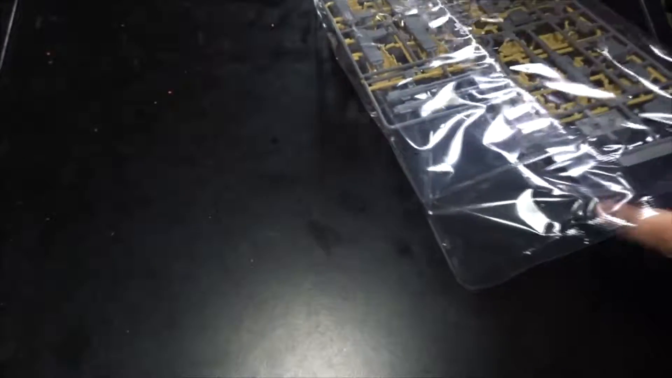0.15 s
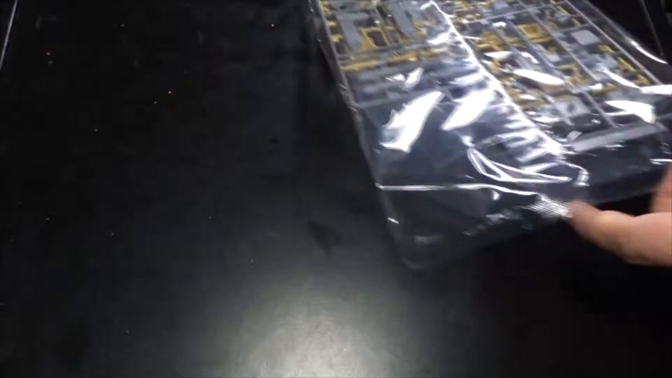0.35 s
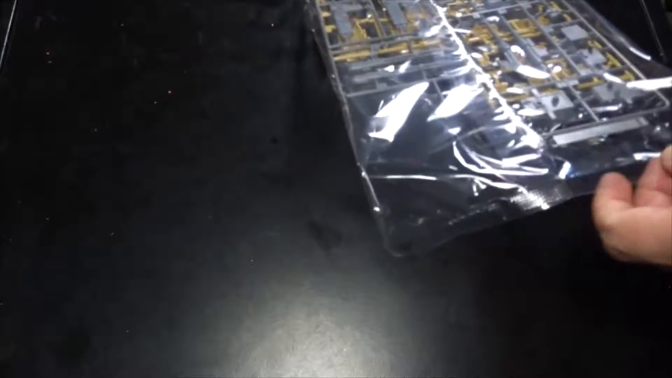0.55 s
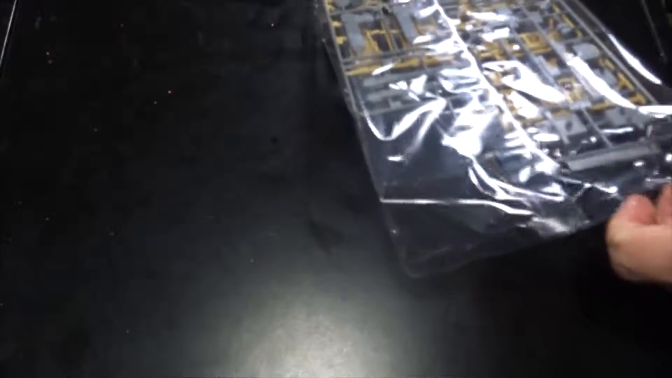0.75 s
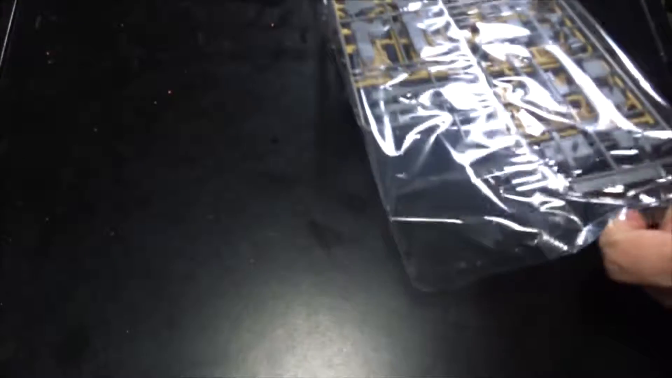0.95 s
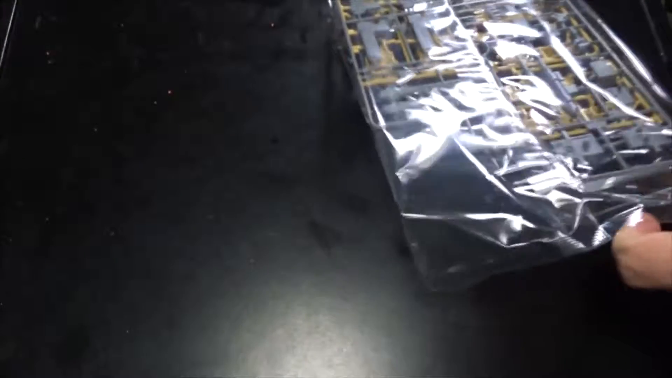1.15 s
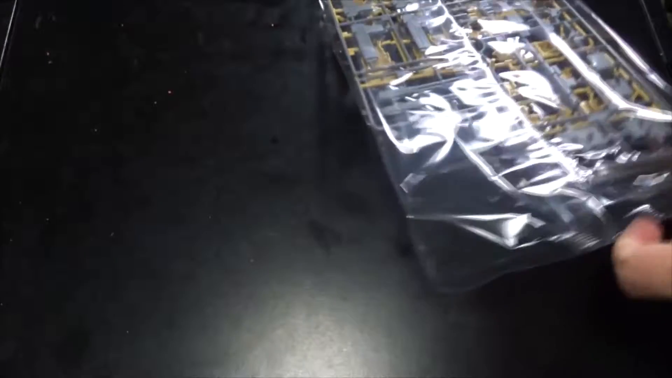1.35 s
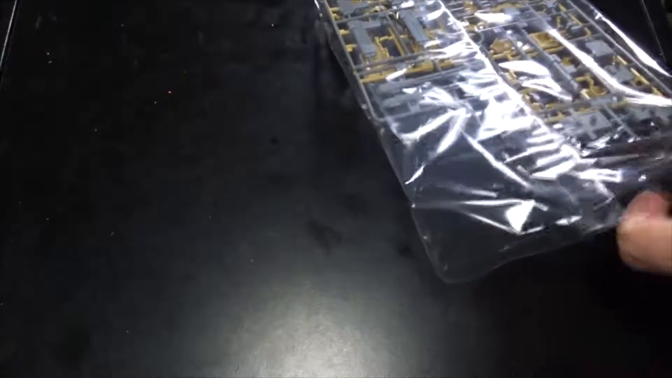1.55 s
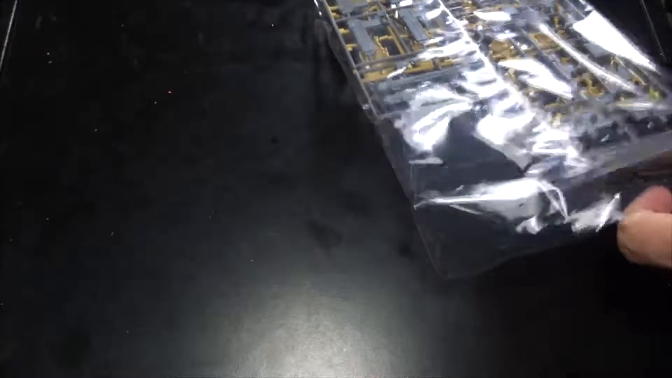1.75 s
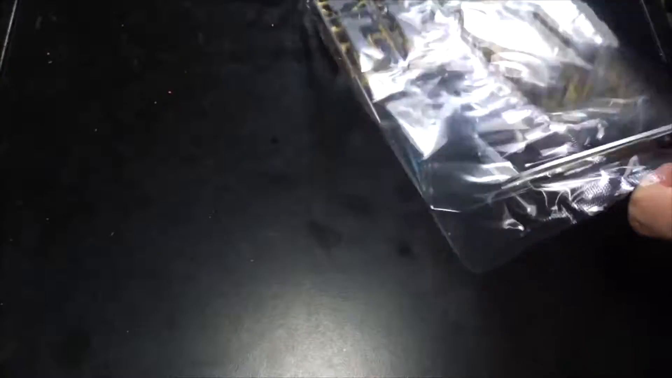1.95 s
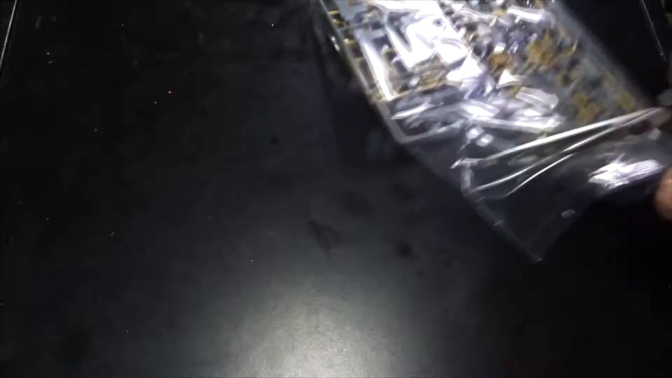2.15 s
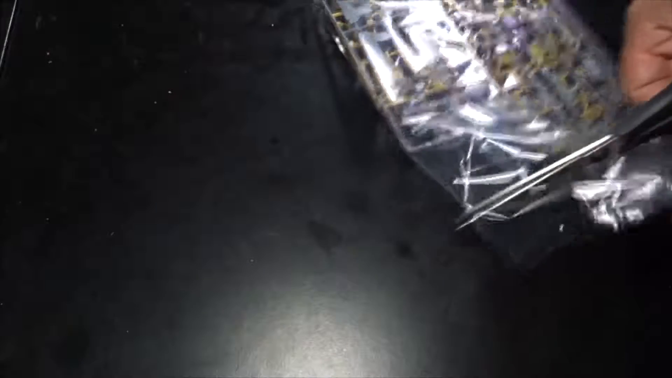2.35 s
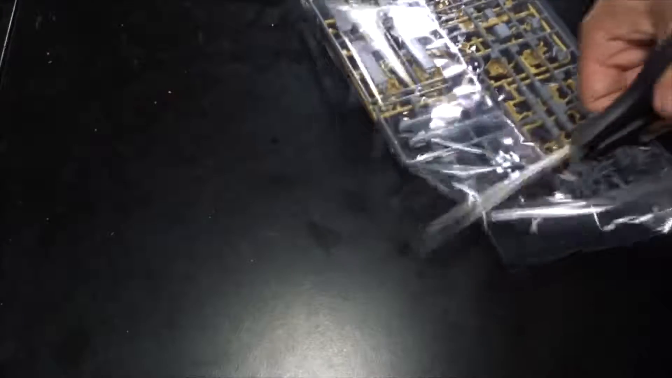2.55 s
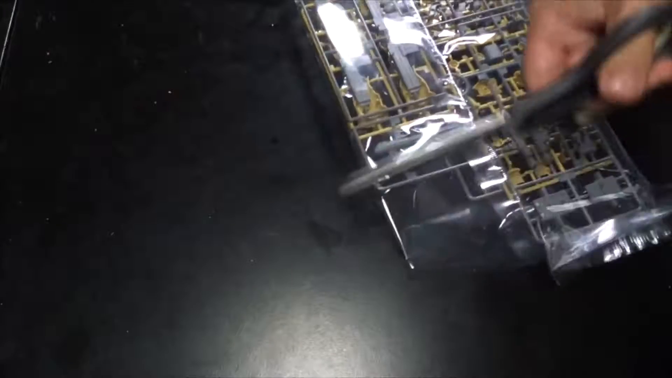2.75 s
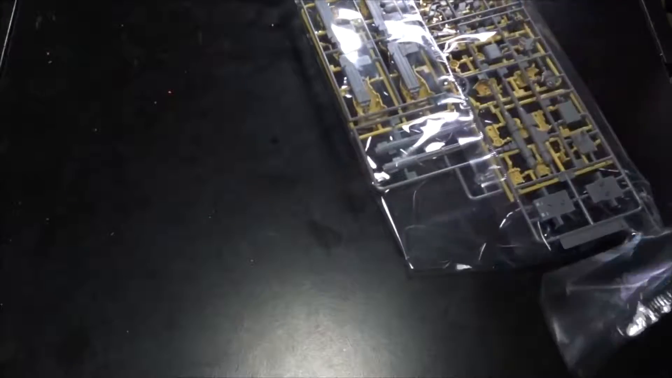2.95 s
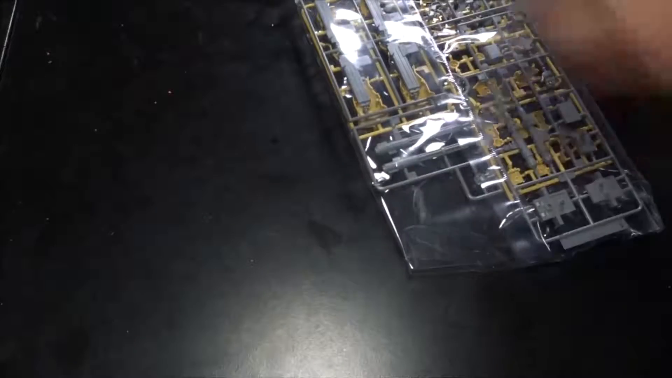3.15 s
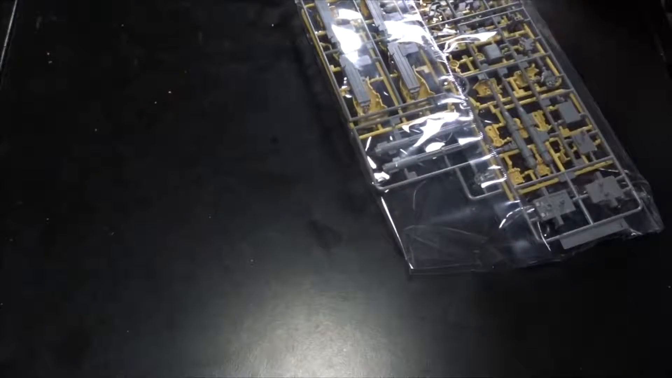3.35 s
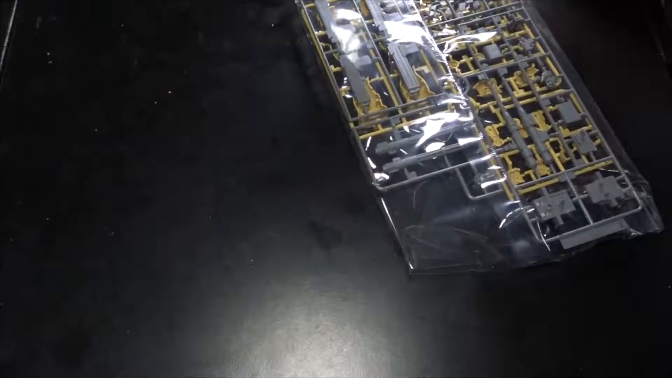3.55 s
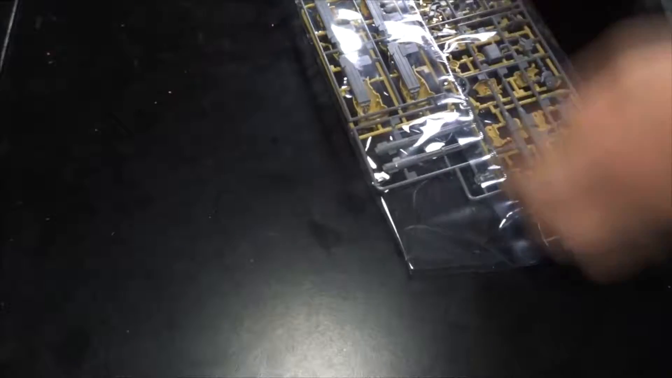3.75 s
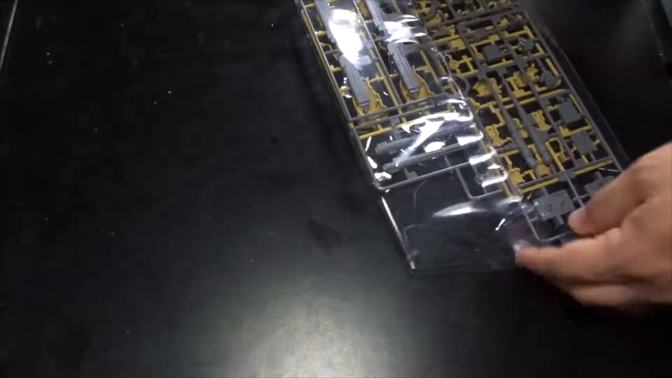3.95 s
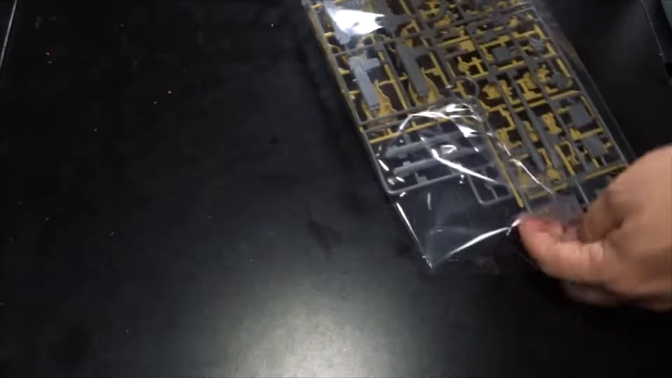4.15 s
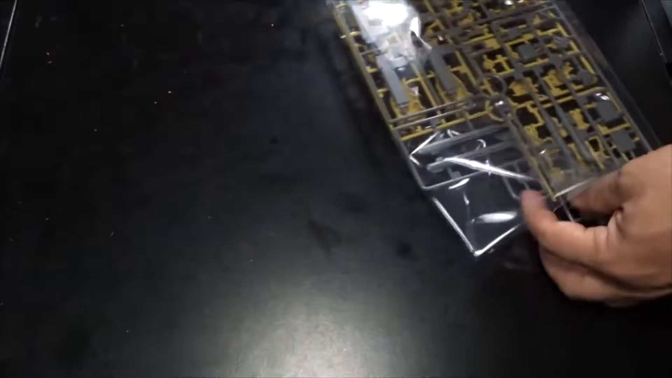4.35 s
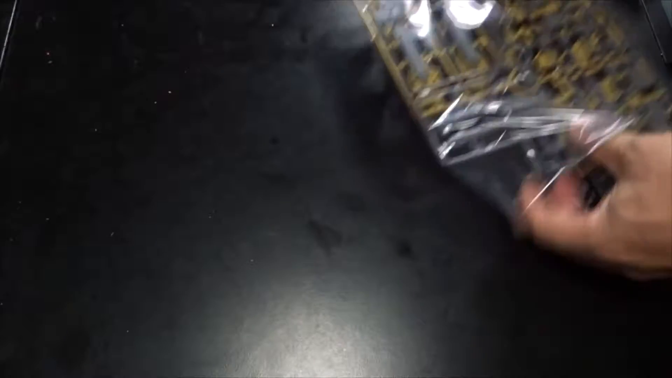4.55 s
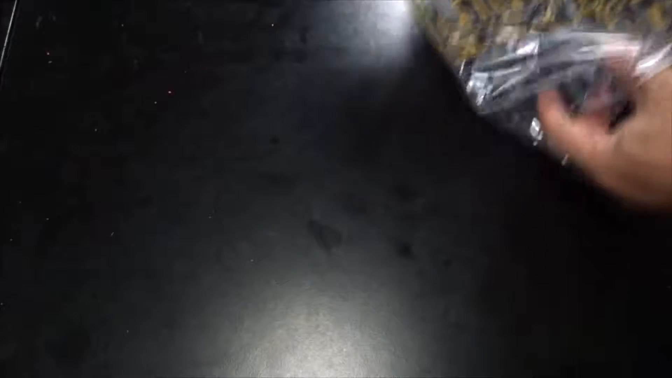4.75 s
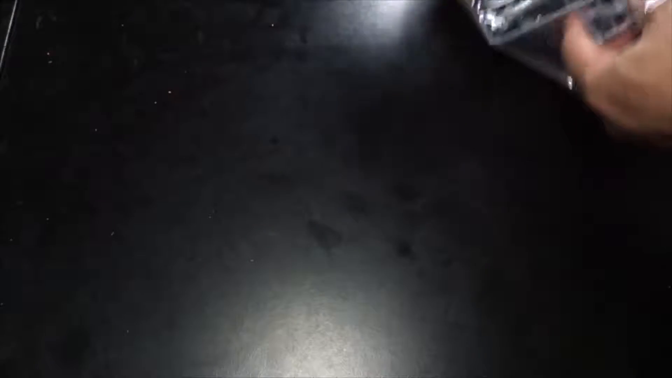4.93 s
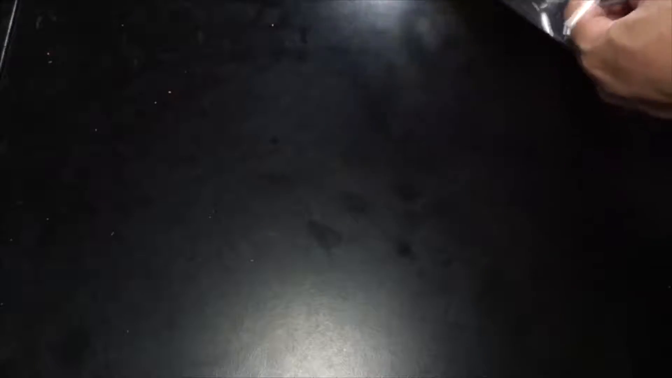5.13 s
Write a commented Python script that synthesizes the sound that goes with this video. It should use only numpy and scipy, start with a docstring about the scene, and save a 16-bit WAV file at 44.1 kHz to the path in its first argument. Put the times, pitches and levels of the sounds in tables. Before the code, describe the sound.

A thin, stiff clear plastic bag of small plastic parts is handled on a table in a small room, heard close in stereo, slightly right of centre. For the first 0.8 seconds there are only faint, scattered ticks over soft room hiss and a barely audible fan hum. From about 0.8 seconds the film bursts into dense, irregular crackling, sharp bright snaps mixed with lower, hollow slack folds, carrying on through pulling and cutting until roughly 2.85. A few isolated ticks follow near 3.1. Scissors are set down: a light knock at 3.4, then a firmer double-edged clack around 3.55 with a bright, short steel rattle. Near-quiet with a couple of ticks until 4.0, then the bag crinkles again, sparse at first, thickening from 4.2 as it is lifted away, with strong, crisp snaps right up to the end at about 5.3. Short room reflections follow each sound.

```python
"""Small, sparse crackles open over a faint fan hum, then swell into a dense spell of sharp plastic snaps.
Hands pull, cut and lift a thin stiff bag on a table, close to a stereo microphone, in two spells.
Between them scissors are laid down with two knocks. A small room answers.
Creases are spiky noise bursts through a resonance; scissors are dying noise through table and blades;
the room is decaying noise used as echoes; the air is shaped noise, the fan a few unsteady sines."""
import sys
import numpy as np
from scipy import signal
from scipy.fft import rfft, irfft, next_fast_len
from scipy.io import wavfile
from scipy.ndimage import map_coordinates

SR = 44100
rng = np.random.default_rng(int(sys.argv[2]) if len(sys.argv) > 2 else 0)


def generate_wav(signal):
    """Clip the signal to [-1, 1] and save it as 16-bit WAV at the path in sys.argv[1]."""
    frames = np.transpose(np.atleast_2d(signal))
    scaled = np.clip(frames, -1, 1) * 32767
    pcm = np.round(scaled).astype(np.int16)
    wavfile.write(sys.argv[1], SR, pcm)


N = 233331  # length in samples


def amp(db):
    """dB to gain."""
    return 10 ** (np.asarray(db) / 20)


def unit(x):
    """Scaled to rms 1."""
    return x / np.sqrt(np.mean(x ** 2) + 1e-20)


def along(points, hz):
    """Read a curve of (Hz, value) points on a log frequency axis."""
    point_hz, value = np.transpose(points)
    return np.interp(np.log(hz + 1), np.log(point_hz + 1), value)


def wobble(rate):
    """A smooth random curve with rate knots a second."""
    knots = rng.standard_normal(int(N * rate / SR) + 4)
    return map_coordinates(knots, [np.arange(N) * rate / SR])


def filtered(x, response):
    """x times a complex response of frequency."""
    m = next_fast_len(N + SR // 2, True)
    return irfft(rfft(x, m) * response(np.fft.rfftfreq(m, 1 / SR)), m)[..., :N]


def causal(points):
    """A minimum-phase response with the gain of (Hz, dB) points, by folding the cepstrum."""
    def response(hz):
        cepstrum = irfft(np.log(np.maximum(amp(along(points, hz)), 1e-6)))
        cepstrum[1:len(hz) - 1] *= 2
        cepstrum[len(hz):] = 0
        return np.exp(rfft(cepstrum))
    return response


def paired(pair, alike):
    """Two unrelated signals mixed to the given left-right likeness."""
    def mix(hz):
        angle = np.arccos(np.clip(along(alike, hz), -1, 1)) / 2
        return np.array([np.cos(angle), np.sin(angle)])
    mid, side = filtered(pair, mix)
    return np.array([mid + side, mid - side])


# colour of the room noise, before its overall level is set: freq_hz [Hz], density_db [dB per Hz]
AIR_COLOUR = [(15, -70), (25, -33.5), (159, -20.5), (245, -7), (313, -10.5), (457, -3), (524, -6), (600, 1),
              (809, -6), (1120, -6), (2150, -12), (15200, -48), (16500, -42)]
# width of the room noise: freq_hz [Hz], left_right_likeness [0 to 1]
AIR_LIKENESS = [(30, .6), (90, 0.98), (150, 1), (550, 0.95), (1650, .5), (5000, .03)]
AIR_DB = -59.5  # rms level around which the hiss drifts


def air():
    """Steady room noise: coloured hiss, nearly mono in the low end and wide in the treble."""
    hiss = paired(rng.standard_normal((2, N)), AIR_LIKENESS)
    hiss = filtered(hiss, lambda hz: amp(along(AIR_COLOUR, hz)))
    return amp(AIR_DB + 0.51 * wobble(3.65)) * unit(hiss)


# hum of the fan: pitch_hz [Hz], level_db [dB rms, before its unsteadiness]
FAN_TONES = [(592, -73), (1008, -80)]


def fan():
    """Faint fan tones: sines whose level and phase waver at random."""
    t = np.arange(N) / SR
    hum = np.zeros(N)
    for pitch_hz, level_db in FAN_TONES:
        level = amp(level_db + 5.3 * wobble(8.1)) * np.sqrt(2)  # a sine peaks at sqrt(2) times its rms
        hum += level * np.sin(2 * np.pi * pitch_hz * t + 1.04 * wobble(22))
    return hum


# how fast the room dies: freq_hz [Hz], t60_s [s]
ROOM_DECAY = [(300, 0.21), (1300, 0.26), (4000, 0.19), (12000, 0.11)]
# width of the room: freq_hz [Hz], left_right_likeness [0 to 1]
ROOM_LIKENESS = [(300, 1), (1000, 0.95), (3000, 0.54), (7000, 0.011)]
ROOM_DB = -7  # gain of the room


def room(x, delay=180):
    """Each frequency dies at its own speed; a fresh random tail, delay samples late, for every quarter second."""
    wet, step = np.zeros((2, N + 2 * SR)), SR // 4
    for start in range(0, N, step):
        hz, t, z = signal.stft(rng.standard_normal((2, SR // 2)), SR, nperseg=128)
        decay = amp(-60 * t / along(ROOM_DECAY, hz)[:, None])
        tail = signal.istft(z * decay, SR, nperseg=128)[1]
        tail = tail / np.linalg.norm(tail[0])
        echo = signal.fftconvolve(x[None, start:start + step], tail, axes=1)
        wet[:, start + delay:][:, :echo.shape[1]] += echo
    wide = paired(wet[:, :N], ROOM_LIKENESS)
    # the echoes carry almost nothing below 170 Hz
    return filtered(wide, lambda hz: 1 / (1 + (170 / (hz + 1)) ** 8))


# resonance of table top and handles: freq_hz [Hz], gain_db [dB per Hz]
TABLE_TOP = [(90, -49), (130, -16.5), (450, -3.5), (600, 1), (800, -8.5), (930, 2.5), (1100, -9),
             (1600, -1), (2000, -15.5), (2500, -5), (4300, -29), (9000, -38), (16000, -82)]
# ringing modes of the blades: pitch_hz [Hz], width_hz [Hz], gain_db [dB]
BLADE_MODES = [(1610, 200, -21), (2280, 670, -0.5), (3730, 540, 2.5), (4600, 340, 0.5), (5540, 1060, -5),
               (8000, 4700, -17)]
# scissors meeting the table, levels ahead of the resonances:
# start_s [s], thud_db [dB], rattle_t60_s [s], blade_db [dB]
CONTACTS = [(3.413, -19, 0.22, -27.5), (3.554, -10, 0.037, -46), (3.571, -15.5, 0.2, -8)]


def steel(hz):
    """Blade resonances in parallel, of alternating sign."""
    total = 0
    for k, (pitch_hz, width_hz, gain_db) in enumerate(BLADE_MODES):
        damping = 1j * hz * width_hz
        total = total + (-1) ** k * amp(gain_db) * damping / (pitch_hz * pitch_hz - hz * hz + damping)
    return total


def scissors():
    """Each contact is a blow and a dying rattle: dull through table and handles, bright through the blades."""
    thud, ring, t = np.zeros(N + SR), np.zeros(N + SR), np.arange(SR // 2) / SR
    for start_s, thud_db, rattle_t60_s, blade_db in CONTACTS:
        noise = rng.standard_normal((2, len(t)))
        at = round(start_s * SR)
        rattle = amp(-60 * t / rattle_t60_s)
        thud[at:][:len(t)] += amp(thud_db) * noise[0] * (amp(-60 * t / 0.04) + 0.38 * rattle)
        ring[at:][:len(t)] += amp(blade_db) * noise[1] * (amp(-60 * t / 0.0065) + 0.26 * rattle)
    contact = filtered(thud[:N], causal(TABLE_TOP)) + filtered(ring[:N], steel)
    return contact * amp([[.3], [-.3], [0]])  # dB to left, right and walls


# the film, with the hollow ring of the parts inside near 1 and 2 kHz: freq_hz [Hz], gain_db [dB per Hz]
FILM_COLOUR = [(80, -63), (140, -34), (600, -7), (800, -6), (920, -9.5), (1150, -2.5), (1520, -7.5),
               (2000, -3), (3200, -2), (6300, -1), (10000, -3.5), (15000, -6), (16500, -44.5)]
GRAIN = 512  # samples in one crease


def creases(s, db, pitch_hz, click_db, length_ms, pan_db, sharp, lag_s, lag_spread):
    """Each crease slips in a spiky burst of a few ms, coloured by its own broad resonance over a flat click.
    Rows: left, right, and what the walls receive."""
    t, hz = np.arange(GRAIN) / SR, np.fft.rfftfreq(GRAIN, 1 / SR)
    draw = rng.standard_normal((len(s), GRAIN + 1))
    slip = amp(-9 * (1000 * t / length_ms[:, None]) ** 2) * (1 - np.exp(-t / 0.00035))
    burst = draw[:, :GRAIN] * np.abs(draw[:, GRAIN - 1::-1]) * slip  # a product of two noises is spiky
    fc = pitch_hz[:, None]
    damping = 1j * hz * fc / sharp
    tone = damping / (fc * fc - hz * hz + damping) + amp(click_db)[:, None]
    direct = rfft(burst, axis=1) * tone
    through_film = irfft(direct * causal(FILM_COLOUR)(hz), axis=1)
    size = amp(db)[:, None] / np.abs(through_film).max(axis=1, keepdims=True)
    lag = lag_s + lag_spread * draw[:, -1:]  # the bag lies to the right: the left port usually hears it later
    left, right = (direct * amp(side * pan_db / 2)[:, None] * np.exp(-1j * np.pi * hz * side * lag)
                   for side in (1, -1))
    # summed over all directions the ripples even out
    outward = tone * np.linalg.norm(burst, axis=1, keepdims=True)
    waves = np.roll(irfft(size * np.array([left, right, outward])), 8, axis=2)  # space for the earlier port
    at = np.round(s * SR).astype(int)[:, None] + np.arange(GRAIN)
    return np.array([np.bincount(at.ravel(), w.ravel(), N + GRAIN)[:N] for w in waves])


# handling of the bag, before each crease draws its size:
# start_s [s], crackle_db [dB], slack_db [large slack folds relative to the crackle, dB]
HANDLING_MOVES = [(0, -69, 8), (.34, -47, -8), (.78, -68.5, 8), (.84, -36, 2), (.91, -43.5, -2),
                  (.98, -23, -22), (1.05, -32, -6.5), (1.24, -20.5, -9.5), (1.41, -30.5, -6.5),
                  (1.469, -23, -4.5), (1.54, -39.5, -11), (1.61, -28, -6), (1.68, -23, -2.5),
                  (1.74, -30.5, -9), (1.79, -36, -0.5), (1.85, -24, -8), (1.99, -18, -5.5),
                  (2.08, -21.5, -12), (2.22, -27.5, -11.5), (2.33, -50.5, 2), (2.41, -30, -5.5),
                  (2.52, -18, -15.5), (2.62, -27, -10.5), (2.68, -22.5, -8.5), (2.71, -15, -6),
                  (2.799, -26.5, -10.5), (2.87, -53, -1.5), (3.39, -63.5, 0), (3.7, -43, -15.5),
                  (3.98, -79, 17.5), (4.21, -45, -3), (4.351, -23.5, -5.5), (4.44, -36.5, -8),
                  (4.5, -22.5, -8), (4.67, -40, -5), (4.81, -30.5, -5), (4.85, -30, -2.5), (4.99, -49, 5),
                  (5.06, -21.5, -4), (5.13, -28, -9), (5.29, -17.5, -7)]
# the slack folds ring higher once the end is cut off: start_s [s], pitch_hz [Hz]
SLACK_PITCH = [(3.0, 1190), (4.0, 1340)]
CREASES = 3000  # small ones in each layer


def crackle():
    """Small creases at random instants, their sizes clumped in time; slack folds give the low ones."""
    start_s, crackle_db, slack_db = np.transpose(HANDLING_MOVES)
    clump = wobble(45)
    total = 0
    for level_db, centre_hz, spread, sharp, length_ms in (
            (crackle_db, [(0, 5100)], .37, 1.97, 1.1),
            (crackle_db + slack_db, SLACK_PITCH, .25, 3.2, 3.5)):
        draw = rng.random((CREASES, 2))
        normal = rng.standard_normal((CREASES, 4))
        s = draw[:, 0] * (N - 1) / SR
        size_db = -3 * np.log(draw[:, 1] + 0.035) - 5  # many small, few large
        size_db = size_db + 2.8 * clump[(s * SR).astype(int)]
        pitch_hz = np.interp(s, *np.transpose(centre_hz)) * np.exp(spread * normal[:, 0])
        total = total + creases(s, np.interp(s, start_s, level_db) + size_db, pitch_hz,
                                click_db=-14 + 3 * normal[:, 2],
                                length_ms=length_ms * np.exp(0.63 * normal[:, 3]),
                                pan_db=-1.2 + 0.85 * normal[:, 1],
                                sharp=sharp, lag_s=2.6e-5, lag_spread=4e-5)
    return total


NEIGHBOURS, USUAL_SNAP_DB = 6, -15  # creases freed by one snap; strength of a usual snap
CASCADE_DB, CASCADE_GROWS = -10, 1.125  # level relative to a usual snap; dB gained per dB of snap strength
CASCADE_S, CASCADE_FADES_DB_PER_S = .012, 245  # typical wait after the first 2 ms; later ones are weaker


def cascades():
    """Each snap frees a few creases nearby, of like pitch, mostly smaller and weaker the later they go."""
    start_s, peak_db, pitch_hz, click_db = np.repeat(SINGLE_SNAPS, NEIGHBOURS, axis=0).T
    delay = .002 - CASCADE_S * np.log(rng.random(len(start_s)) + 1e-3)
    normal = rng.standard_normal((len(start_s), 4))
    db = USUAL_SNAP_DB + CASCADE_DB + CASCADE_GROWS * (peak_db - USUAL_SNAP_DB)
    db = db - CASCADE_FADES_DB_PER_S * delay + 3.1 * normal[:, 0]
    return creases(start_s + delay, db, pitch_hz * np.exp(0.39 * normal[:, 1]), click_db - 2.0,
                   length_ms=1.97 * np.exp(0.56 * normal[:, 2]), pan_db=-1.3 + 1.2 * normal[:, 3],
                   sharp=1.3, lag_s=2.5e-5, lag_spread=3e-5)


# distinct single snaps, from faint ticks to loud cracks: start_s [s], peak_db [dB, before panning],
# pitch_hz [Hz], click_db [flat click relative to the resonance, dB]
SINGLE_SNAPS = [(0.08, -29, 2010, -9), (0.123, -31.5, 1210, -5), (0.16, -35, 3180, -17),
                (0.165, -35.5, 3190, -28), (0.189, -37, 1090, -24), (0.282, -30.5, 5170, -6),
                (0.336, -31.5, 2100, -13), (0.346, -24, 1750, -2), (0.392, -27.5, 5160, -1),
                (0.398, -38, 3940, -10), (0.504, -34, 1230, -34), (0.648, -38, 1960, -36),
                (0.749, -30, 1010, -12.5), (0.823, -22, 4500, -11), (0.832, -18.5, 4550, 5),
                (0.842, -25, 4200, -19), (0.848, -21.5, 4800, -15), (0.862, -24, 1130, -18),
                (0.869, -19, 3870, -4), (0.922, -25, 3600, -19), (0.941, -15, 4670, 1),
                (0.949, -17.5, 2620, -23), (0.964, -20.5, 1100, -20), (1.023, -21, 8000, -25),
                (1.07, -29, 1140, -24), (1.099, -19, 4880, -13), (1.143, -14, 2420, -9),
                (1.163, -13.5, 5420, -3), (1.184, -17, 4900, 3), (1.206, -21, 5790, -11),
                (1.22, -10.5, 2260, -1), (1.24, -10.5, 2150, -1), (1.248, -13, 5720, -11),
                (1.263, -21, 5700, -11), (1.294, -11, 3300, -8.5), (1.344, -11, 4140, -9),
                (1.354, -15.5, 5510, 3), (1.394, -14.5, 4460, 1), (1.418, -16.5, 3790, -16),
                (1.468, -14.5, 3880, 0), (1.477, -22, 3800, -14), (1.567, -20.5, 4840, -8),
                (1.579, -24.5, 5700, 1), (1.599, -13, 5540, 2), (1.649, -15, 5830, -11),
                (1.669, -14, 6400, -14), (1.686, -16, 1180, -5), (1.709, -24, 1190, -1),
                (1.746, -11, 6200, 6), (1.809, -11, 1970, -5.5), (1.818, -11.5, 3820, -2),
                (1.842, -15, 5770, 4), (1.876, -11, 1160, -3), (1.909, -17, 3800, 0),
                (1.953, -18, 6240, -11), (1.984, -9.5, 1170, -11), (2.035, -20.5, 2690, -11),
                (2.086, -14.5, 4170, -11), (2.102, -24, 3910, -3), (2.125, -18, 4370, -8),
                (2.149, -19, 4230, -4), (2.164, -16, 1120, -12), (2.192, -15.5, 4940, -24),
                (2.224, -24, 3020, -16), (2.306, -22.5, 2510, 2), (2.346, -26.5, 5490, 0),
                (2.354, -12, 2950, 8), (2.388, -10, 6640, -9), (2.414, -11.5, 6960, -16),
                (2.425, -16, 5350, -12), (2.47, -19, 6250, -11), (2.491, -17, 4940, -12),
                (2.515, -19, 2520, 2), (2.54, -15, 5040, 10), (2.59, -14, 5270, -9),
                (2.627, -19.5, 3200, -10), (2.635, -9, 8040, -10), (2.708, -10, 3850, -23),
                (2.731, -20, 2180, -19), (2.772, -12, 2120, -6), (2.867, -24.5, 3320, -2),
                (3.04, -19.5, 7140, -29), (3.083, -30.5, 6500, 0), (3.142, -28, 4050, 6),
                (3.404, -29, 1590, 1), (3.444, -25.5, 1770, -1), (3.458, -30, 1670, -17),
                (3.642, -25, 3820, -7), (3.709, -27, 3340, 3), (3.898, -40.5, 1500, -20),
                (4.008, -35, 1150, -12), (4.044, -23.5, 1790, -5), (4.08, -18.5, 1960, -31),
                (4.104, -20.5, 3070, -13), (4.122, -19, 1920, -26), (4.142, -13.5, 6100, -6),
                (4.187, -17, 1640, 0), (4.225, -9, 2150, -5.5), (4.271, -18.5, 1460, -7),
                (4.303, -22.5, 3900, -8), (4.334, -13, 3020, 1), (4.344, -17.5, 7750, -14),
                (4.371, -14, 2000, -9), (4.428, -13, 3980, -4), (4.462, -19, 3810, -4),
                (4.485, -10, 3880, -1), (4.497, -9.5, 6500, 4), (4.503, -14.5, 2920, -8),
                (4.537, -11.5, 2560, 3), (4.543, -10, 6800, 1), (4.578, -18, 3210, -12),
                (4.6, -13.5, 4200, -2), (4.63, -13, 1780, 2), (4.675, -19, 2220, -8),
                (4.689, -16, 4970, -2), (4.701, -15.5, 1800, -12), (4.74, -14.5, 5260, -15),
                (4.762, -22.5, 6300, -3), (4.79, -16.5, 1760, -10), (4.827, -12, 2670, -9),
                (4.833, -11.5, 1700, -5), (4.865, -11.5, 8900, -5), (4.886, -22, 6560, -8),
                (4.906, -19, 1350, -9), (4.922, -13.5, 3580, -12), (4.962, -17.5, 2460, 0),
                (5.004, -12, 3560, -2), (5.048, -9, 2540, 12), (5.065, -11.5, 2480, -4),
                (5.11, -22, 3480, -5), (5.141, -15.5, 4260, 11), (5.157, -11, 2060, -2),
                (5.174, -11, 4400, 15), (5.194, -10.5, 3900, -1), (5.201, -11.5, 6320, 9),
                (5.233, -10, 4900, 5), (5.258, -16.5, 1160, -13), (5.264, -13, 4460, -20)]
SNAP_MS, SNAP_SCATTER = 2.7, 0.11  # usual length of a snap, and its spread in log units


def snaps():
    """Single creases that let go, faint or loud, each with its own pitch and click."""
    start_s, peak_db, pitch_hz, click_db = np.transpose(SINGLE_SNAPS)
    chance = rng.standard_normal((len(SINGLE_SNAPS), 2))
    return creases(start_s, peak_db, pitch_hz, click_db,
                   length_ms=SNAP_MS * np.exp(SNAP_SCATTER * chance[:, 0]),
                   pan_db=-1.5 + 0.43 * chance[:, 1], sharp=3.45, lag_s=2.5e-5, lag_spread=2.5e-5)


def bag():
    """Single snaps, the creases they free and the clumped crackle, all sounding through the film."""
    return filtered(crackle() + cascades() + snaps(), causal(FILM_COLOUR))


def scene():
    """The bag and scissors up close, the room's answer, and the air and fan behind."""
    left, right, outward = bag() + scissors()
    return np.array([left, right]) + amp(ROOM_DB) * room(outward) + air() + fan()


# body shadow between the ports: freq_hz [Hz], left_minus_right_db [dB]
PORT_BALANCE = [(200, 0.2), (600, 0.9), (1500, -1.3), (4000, -0.1), (10000, 1.4)]
TOP_HZ = 16000  # band limit


def record(dry):
    """The two ports differ a little in colour; nothing passes above the band limit."""
    def ports(hz):
        half_db = along(PORT_BALANCE, hz) / 2
        return amp(half_db * np.array([[1], [-1]])) * (hz < TOP_HZ)
    return filtered(dry, ports)


dry = scene()
out = record(dry)
generate_wav(out)
```